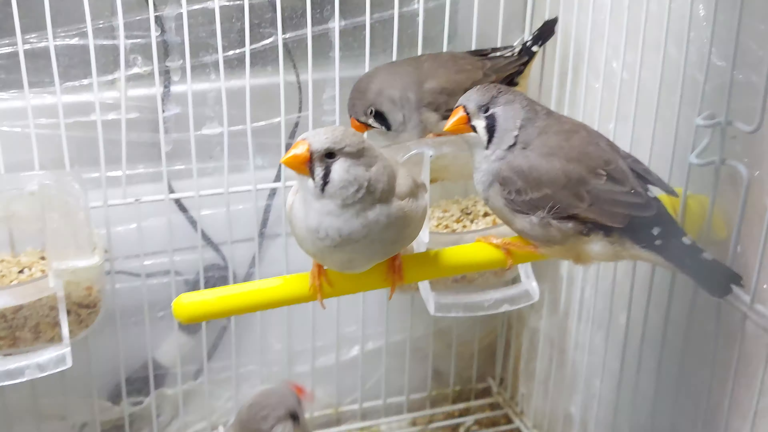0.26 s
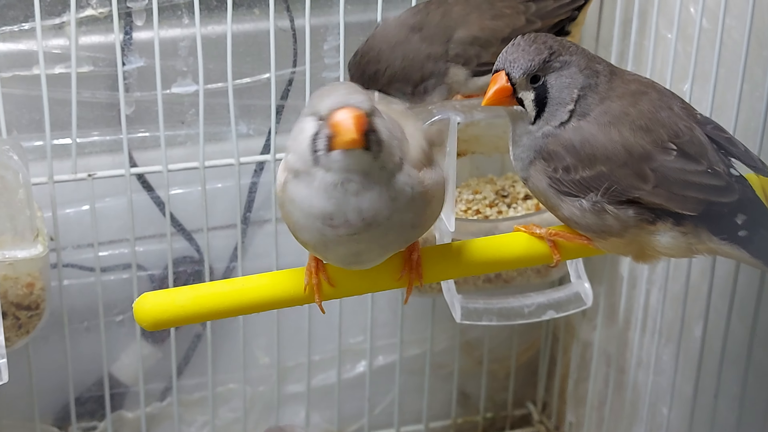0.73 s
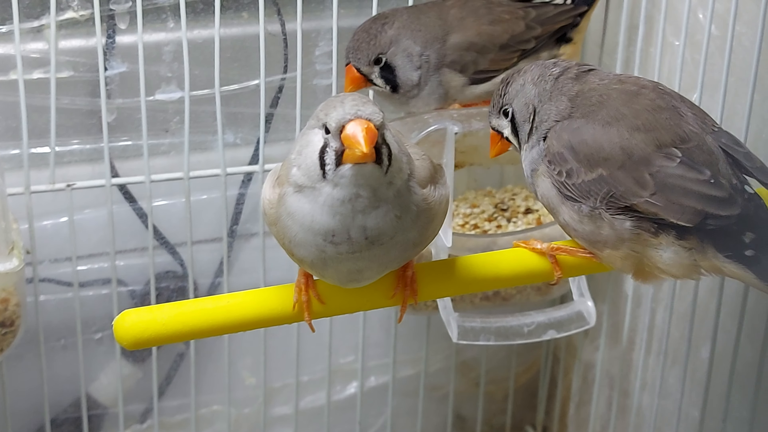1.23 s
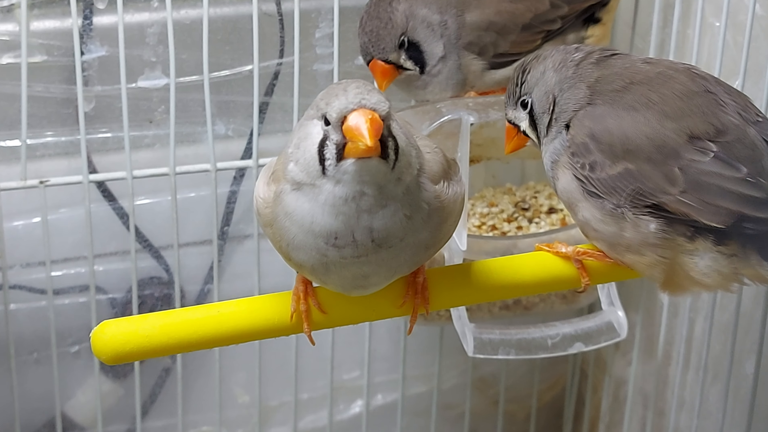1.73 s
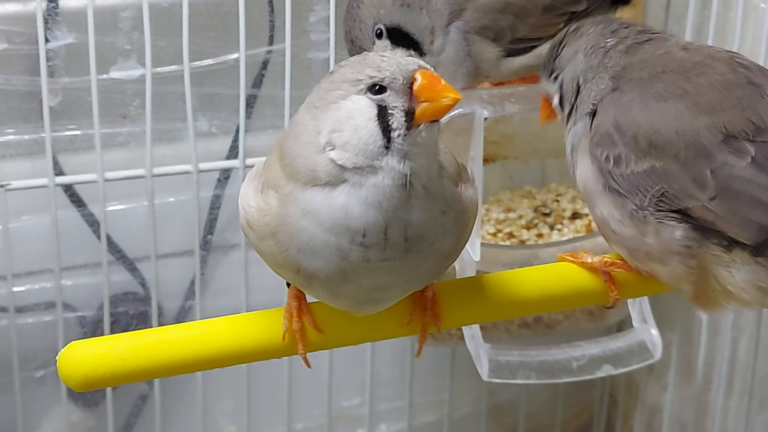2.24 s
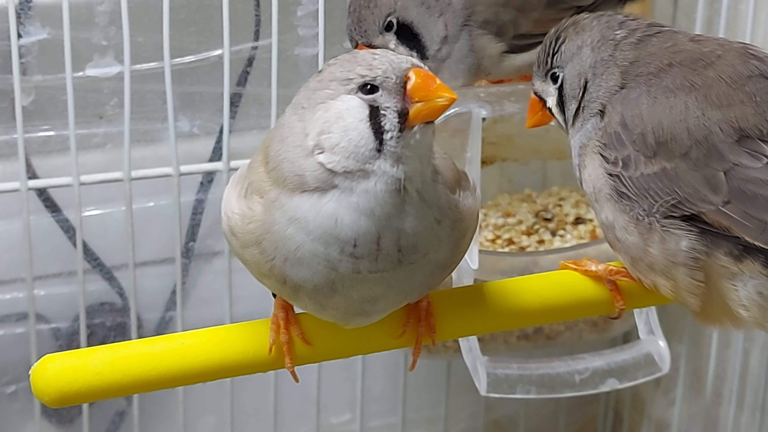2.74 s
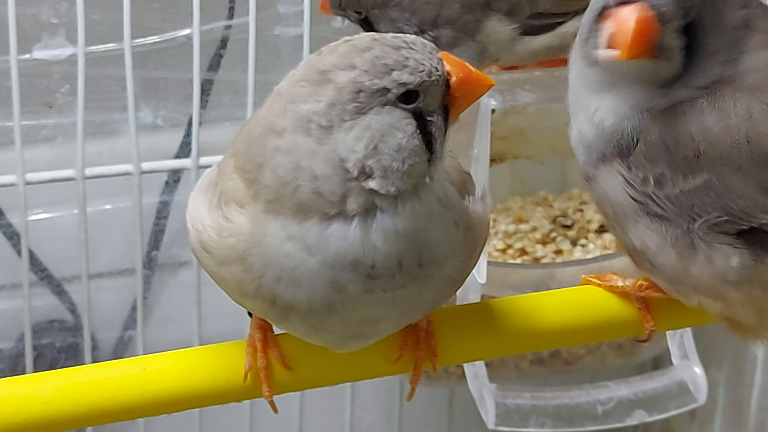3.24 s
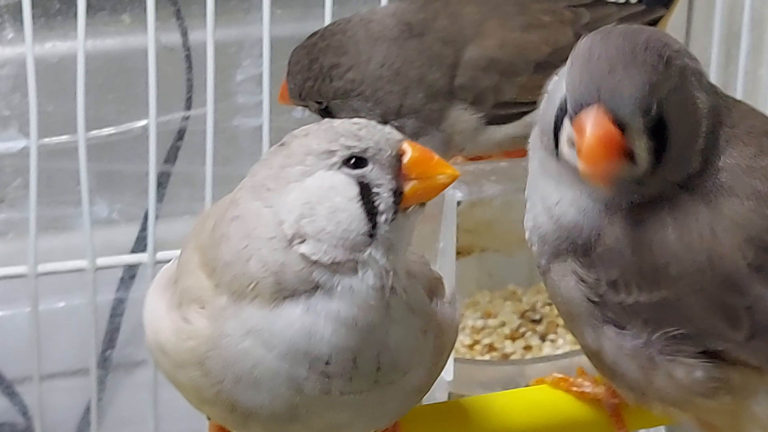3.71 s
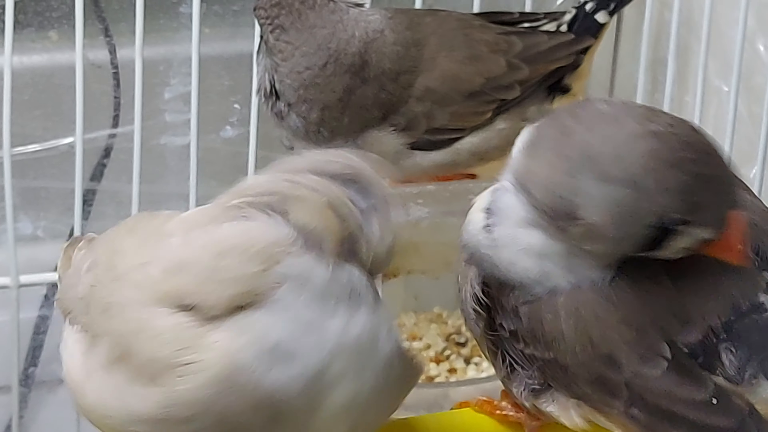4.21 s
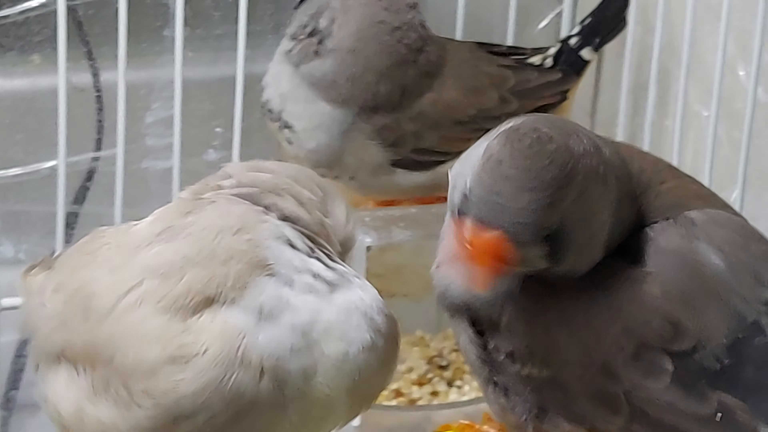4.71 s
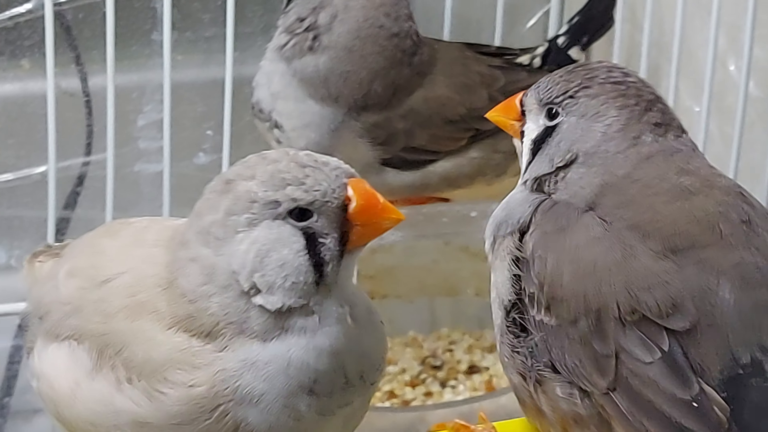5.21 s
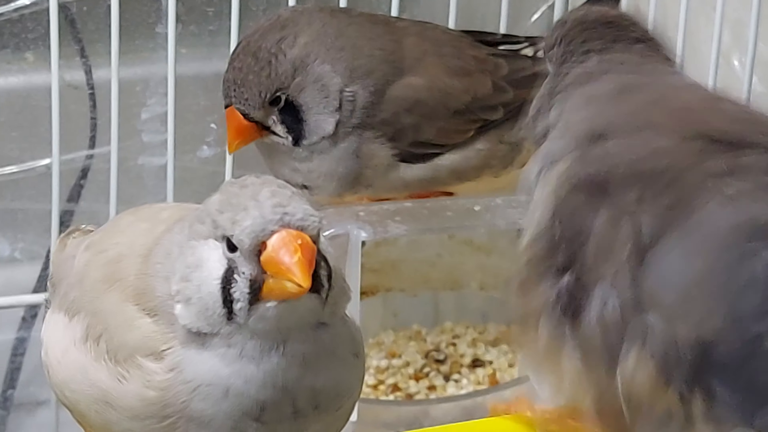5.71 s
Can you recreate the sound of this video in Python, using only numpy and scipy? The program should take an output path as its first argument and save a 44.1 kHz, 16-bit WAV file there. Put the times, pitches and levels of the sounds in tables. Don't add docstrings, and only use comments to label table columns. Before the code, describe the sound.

A husk smacks the microphone as a low drone fades; finches call twice harshly, then softly, among ticks, rustles, knocks and fluttering wings.

```python
import sys
import numpy as np
from scipy import signal
from scipy.fft import rfft, irfft
from scipy.io import wavfile
from scipy.ndimage import uniform_filter1d, map_coordinates

SR = 44100
rng = np.random.default_rng(int(sys.argv[2]) if len(sys.argv) > 2 else 0)


def invert_db(level):
    return 10 ** (np.asarray(level, dtype=float) / 20)


def pcm_store(signal):
    levels = np.round(np.clip(np.atleast_2d(signal), -1, 1) * 32767)
    wavfile.write(sys.argv[1], SR, levels.astype(np.int16).T)


N = 262395
SWELL_DB = 10


def on_hz(points, hz):
    p = np.array(points, float)
    return np.interp(np.log(np.maximum(hz, 1)), np.log(p[:, 0]), p[:, 1])


def unit(x):
    return x / np.sqrt(np.mean(x ** 2, axis=-1, keepdims=True) + 1e-30)


def tint(x, gain):
    n = x.shape[-1]
    return irfft(rfft(x) * gain(np.arange(n // 2 + 1) * SR / n), n)


def hump(f, hz, width):
    return 1 / np.sqrt(1 + ((f * f - hz * hz) / (width * f + 1e-9)) ** 2)


def walk(n, rate):
    k = max(int(SR / rate), 1)
    return unit(uniform_filter1d(uniform_filter1d(rng.standard_normal(n), k), k))


def columns(table):
    s, *cols = np.transpose(table)
    t = np.arange(int(s[0] * SR), int(s[-1] * SR)) / SR
    return int(s[0] * SR), [np.interp(t, s, c) for c in cols]


def fade(n, edge_s):
    i = np.arange(n)
    return np.clip(np.minimum(i, n - i) / (edge_s * SR), 0, 1)


def add(out, x, start, pan_db):
    lag_s_per_db = .000012
    gains = invert_db(np.array([pan_db, -pan_db]) / 2)
    gains = gains * 2 / gains.sum()
    lag = int(round(np.clip(pan_db, -12, 12) * lag_s_per_db * SR))
    for ch, i in enumerate((start + max(-lag, 0), start + max(lag, 0))):
        n = min(x.shape[-1], N - i)
        out[ch, i:i + n] += gains[ch] * (x[ch] if x.ndim > 1 else x)[:n]


def air():
    # (time [s], rumble level [dB])
    traffic = [(0.0, -52.5), (.55, -60.5), (.79, -53.5), (1.2, -62), (2.2, -55), (3.4, -56.5), (4.5, -58.5),
               (5.1, -62.5), (5.95, -54)]
    # (time
    # [s], level [dB])
    stir = [(0.0, 3.5), (.55, -4), (.79, 9.5), (1.11, 1.5), (1.29, -8.5), (1.84, -3.5), (1.97, 1),
            (2.2, -3), (2.77, 5), (3.08, -2.5), (3.33, 4), (3.5, -1), (4.14, 1), (4.27, 2), (4.52, -2),
            (4.8, 6.5), (5.05, 3), (5.45, -3)]
    # (frequency [Hz], level [dB])
    colour = [(15, -36.5), (25, -5), (63, 1.5), (111, 2.5), (150, 1), (208, -15.5), (339, -16),
              (553, -26.5), (2090, -32.5), (3150, -45), (7300, -40.5), (9330, -47.5), (12600, -38.5),
              (15200, -43), (16500, -71.5)]
    # (frequency [Hz], likeness [0-1])
    likeness = [(30, 1), (130, 1), (290, 0.8), (640, 0.16), (1400, 0), (16000, 0)]
    t = np.arange(N) / SR
    stir_db = np.interp(t, *np.transpose(stir))
    # (level [dB], low edge [Hz], high edge [Hz], flicker [dB], trim [dB])
    bands = [(np.interp(t, *np.transpose(traffic)), 34, 220, 1.5, 3),
             (-67.5 + 0.85 * stir_db, 220, 2700, 2.2, 1.5),
             (-71 + 0.79 * stir_db, 2700, 20000, 2.2, 1.5)]
    out = 0
    for db, lo_hz, hi_hz, flicker_db, trim_db in bands:
        band = lambda f: invert_db(on_hz(colour, np.minimum(f, 14000))) * (f > lo_hz) * (f <= hi_hz)
        like = lambda f: np.clip(on_hz(likeness, f), 0, 1)
        mid = tint(rng.standard_normal(N), lambda f: band(f) * np.sqrt(1 + like(f)))
        side = tint(rng.standard_normal(N), lambda f: band(f) * np.sqrt(1 - like(f)))
        pair = unit(np.array([mid + side, mid - side]))
        out = out + pair * invert_db(trim_db + db + flicker_db * walk(N, 25))
    return out


def swell(s, before_s, after_s, hz, glide_before, glide_after, db, drop_db=SWELL_DB):
    start = max(int((s - 2 * before_s) * SR), 0)
    x = np.arange(start, int((s + 2 * after_s) * SR)) / SR - s
    away = np.abs(x) / np.where(x < 0, before_s, after_s)
    return start, hz + x * np.where(x < 0, glide_before, glide_after), db - drop_db * away ** 1.3


def tones(lines, waver, unsteady_db, rate, spread_db):
    out = np.zeros((2, N))
    port_phase = .5 * np.array([[.5], [-.5]])
    for start, hz, db in lines:
        n = len(hz)
        phase = 2 * np.pi * np.cumsum(hz * (1 + waver * walk(n, rate))) / SR
        strength = invert_db(db + unsteady_db * walk(n, rate)) * fade(n, 0.05 / rate + 1 / hz[0])
        line = np.sqrt(2) * np.sin(phase + port_phase) * strength
        add(out, line, start, spread_db * rng.standard_normal())
    return out


def street():
    # (loudest time [s], half length [s], pitch [Hz], glide
    # [Hz/s], level [dB rms])
    drones = [(0.0, 0.285, 78.2, 0, -39.5), (0.5, .25, 77.5, 22, -57), (2, .14, 59, 31, -53.5),
              (2.5, 0.305, 74.05, -0.5, -53), (2.5, .12, 82.84, 12, -44), (3, .45, 83.8, 0.5, -50.5),
              (3, 0.81, 26, -5.5, -55), (2.5, .15, 123.9, 18, -50), (3.5, .15, 128.6, 7, -50),
              (4, 0.2194, 97.6, -6.5, -50), (4, 0.24, 104, 1.5, -55), (5, .6, 34, -1, -60.5),
              (5.6, .4, 52, -5, -62.5), (5.94, 0.26, 46, -42, -49), (0.95, .025, 90, -200, -49)]
    # (loudest time [s], half length [s], pitch [Hz], glide [Hz/s], level [dB rms])
    squeals = [
        (.03, 0.048, 813, -100, -68),
        (1.51, .045, 1860, -300, -71),
        (1.73, .04, 1280, -1200, -76.5),
        (1.72, 0.029, 10050, -3700, -78),
        (4.99, 0.035, 7760, -6000, -75),
        (5.31, .015, 4950, -9000, -77.5),
    ]
    # (turning time [s], pitch [Hz], glide before [Hz/s], glide after [Hz/s], level [dB rms])
    whistles = [
        (2.475, 6330, 8700, -5500, -78),
        (4.17, 11450, 15000, -5600, -70),
        (5.03, 800, 1300, -150, -73),
        (5.09, 5680, -3600, 3000, -81),
        (4.95, 6250, 1000, -4000, -83),
    ]
    straight = lambda rows: [swell(s, half_s, half_s, hz, glide, glide, db)
                             for s, half_s, hz, glide, db in rows]
    bent = [swell(s, .045, .14, *rest, drop_db=3.5) for s, *rest in whistles]
    away = np.abs(np.arange(N) / SR - 5.18) / 0.63
    tyres = unit(tint(rng.standard_normal((2, N)), lambda f: hump(f, 6660, 980) ** 2))
    hiss = tyres * invert_db(-74 - SWELL_DB * away ** 2)
    thin = tones(straight(squeals) + bent, waver=.009, unsteady_db=4, rate=220, spread_db=0)
    engines = tones(straight(drones), waver=0.0069, unsteady_db=2.2, rate=5.3, spread_db=2.0)
    return engines + thin + hiss


def bars():
    # (time [s], pitch [Hz], peak level [dB], t60 [s])
    wires = [
        (.0124, 8400, -25, .004),
        (3.231, 5620, -50, .13),
        (3.231, 9650, -57, .11),
        (3.231, 11930, -56, .09),
        (3.128, 11800, -65, .12),
        (3.371, 12600, -53, .04),
        (3.668, 8400, -57, .05),
        (3.94, 4500, -63, .2),
    ]
    out, t = np.zeros((2, N)), np.arange(8192) / SR
    for s, hz, db, t60 in wires:
        phase = 2 * np.pi * np.cumsum(hz * (1 + 0.0061 * walk(len(t), 150))) / SR
        ring = np.sin(phase + rng.uniform(0, 2 * np.pi, (2, 1)))
        add(out, invert_db(db - 60 * t / t60) * ring, int(s * SR), 0)
    return out


def taps():
    # (time [s], peak level [dB], port ring [Hz], snap level [dB], left minus right [dB])
    husks = [
        (0.0127, -10, 4600, 8.5, -52),
        (3.0356, -2.5, 1610, 6.5, 97.5),
        (4.8, -6.5, 1220, -21, 42),
        (5.8984, -17, 1920, -14, 7),
        (1.5248, -23.5, 1690, 14, -5),
        (1.7941, -26, 1330, -13, 9.5),
        (4.7483, -21, 7400, 1, -15),
    ]
    out, t = np.zeros((2, N)), np.arange(1024) / SR
    for s, db, hz, snap_db, pan_db in husks:
        swing = np.sin(2 * np.pi * hz * t) * t * hz * np.exp(-t * hz / 0.28) * 11.7
        edge = np.sin(2 * np.pi * 12000 * t) + 0.53 * np.sin(2 * np.pi * 6800 * t)
        snap = invert_db(snap_db) * edge * t / .00007 * np.exp(-t / 0.00009)
        noise = unit(tint(rng.standard_normal(len(t)), lambda f: hump(f, 1200, 3500)))
        rattle = invert_db(-20.5) * noise * np.exp(-t / .002)
        add(out, invert_db(db - 12.0) * (swing + snap + rattle), int(s * SR), pan_db)
    return out


def knocks(events, decay_s, rise_s, sharp, grain_db, apart):
    # (frequency [Hz], level [dB])
    snap_colour = [(2500, -9), (4500, -2.5), (6500, -0.5), (9000, -7.5), (13000, 6.5), (15800, -8)]
    out, t = np.zeros((2, N)), np.arange(4096) / SR
    for s, db, hz, treble_db, bass_db, pan_db in events:
        noise = rng.standard_normal((3, 1, len(t))) + apart * rng.standard_normal((3, 2, len(t)))
        shape = (1 - np.exp(-t / rise_s)) * np.exp(-t / decay_s) * invert_db(grain_db * walk(len(t), 450))
        ring = unit(tint(noise[0], lambda f: hump(f, hz, hz / sharp)))
        snap = invert_db(treble_db) * unit(tint(noise[1], lambda f: invert_db(on_hz(snap_colour, f))))
        thud = invert_db(bass_db) * unit(tint(noise[2], lambda f: hump(f, 300, 340) ** 2))
        add(out, invert_db(db - 14.0) * (ring + snap + thud) * shape, int(s * SR), pan_db)
    return out


def scuffs():
    # (time [s], peak level [dB], ring [Hz], treble [dB], left minus right [dB])
    rustles = [(0.9424, -39.5, 4250, -4, -16.5), (1.02, -43, 4026, -4.5, -8.5),
               (1.1506, -49, 8700, -7.5, -8), (1.3753, -46.5, 8420, -3.5, -6), (1.5834, -54, 4400, 11, 0.5),
               (3.2311, -38.5, 4960, 4, 7.5), (4.37, -53, 7240, 6.5, 0.5), (5.7593, -48.5, 6570, 5.5, 1),
               (5.7834, -35, 6760, 6, 1.2), (5.8255, -34.5, 6400, 2, 1), (5.8613, -36, 5570, 6.5, -1),
               (5.842, -43, 6000, 8.5, 1), (5.907, -45.5, 5500, 8, 0.5), (5.932, -47, 4000, 6, 1),
               (0.0, -40.5, 4500, -13, 3), (0.0, -44, 2100, -23, -2.5), (2.73, -49.5, 4260, -8, 0),
               (2.86, -47, 4180, -7, 0.5)]
    # (time [s], peak level [dB], treble [dB], thud [dB], left minus right [dB])
    hops = [(0.2034, -62, 13.5, 25, -1), (0.9437, -40.5, -25, 10, -5), (1.3023, -45.5, -10, -4.5, 8),
            (1.3457, -56, 6.5, -6.5, 5.5), (1.8332, -38.5, -31, 5, 5.5), (2.0155, -36, -4, -20, -2.7),
            (3.3722, -36.5, -9.5, -31, 8), (3.6713, -51, 1.5, 11.5, 0), (4.2096, -49, 10, -19, 1),
            (4.2567, -41.5, -1, -17, 0), (4.294, -54.5, 14.5, -19.5, -1.5), (5.2674, -52, -26, -19.5, 12.5),
            (5.5886, -52.5, 4.5, -22, -0.5)]
    # (time [s], peak level [dB], treble [dB], thud [dB], left minus right [dB])
    tray = [(1.555, -48.5, -13, -13, 0.5), (1.6, -49, -15, -15, 0), (1.6653, -51.5, -18, -29, 5),
            (1.7962, -54, -25, -16, -12), (1.944, -51.5, -26, -7.5, -3), (2.8482, -44, -19, -39, 1),
            (3.3353, -45.5, -4, 1, 2), (3.685, -45, -15, 9.5, 5.5), (3.8064, -52, 2, 3, 6),
            (3.9353, -43.5, 4, -20, 7), (5.2164, -43.5, -16.5, 1, 3.5)]
    # (time [s], peak level [dB], treble [dB], thud [dB], left minus right [dB])
    digs = [
        (1.495, -55.5, 10.5, 0, 0.5),
        (2.7224, -41, -35, -5, 3),
        (4.4055, -50, 8, -33, 2.3),
        (4.8795, -40.5, -3, -2, 6.5),
    ]
    events = []
    for ring_hz, rows in ((828, hops), (1330, tray), (1800, digs)):
        events += [(s, db, ring_hz, *rest) for s, db, *rest in rows]
    events += [(*row, -15, pan_db) for *row, pan_db in rustles]
    return knocks(events, decay_s=0.025, rise_s=0.00068, sharp=1.58, grain_db=2.0, apart=1.0)


def clicks():
    # (time [s], peak level [dB], ring [Hz], treble [dB], left minus right [dB])
    ticks = [(5.8996, -18, 2300, 0, 1.5), (1.0658, -28, 4460, -1, 6), (1.794, -35.5, 1340, -6.5, 6.5),
             (2.0775, -31, 1414, -18.5, -19), (2.2739, -39.5, 3200, -41, 9),
             (2.5326, -36, 3580, -0.5, 12.5), (2.6186, -36.5, 1480, -27, 9), (2.6485, -31.5, 1350, -2, 9),
             (2.671, -36.5, 1230, 5.5, 15.5), (2.9466, -50.5, 2170, 8, 9), (2.9731, -36, 1000, -34, 12),
             (3.4485, -20.5, 1800, -5.5, 35), (4.559, -37, 1964, -11, 8.5), (4.6665, -22.5, 5600, 8, -4),
             (4.747, -31.5, 7300, 4, -10), (5.1463, -35.5, 7050, 2, -2), (5.697, -41.5, 6300, -3, -1),
             (5.874, -26.5, 5700, 7.5, 3), (0.1368, -48, 2080, -5, 4), (0.376, -49.5, 2040, 10, -7.5),
             (1.5851, -38.5, 4400, 1.5, 0), (2.8, -38, 1410, -12, 7), (3.3142, -43, 1150, -10, 9),
             (3.338, -32, 1207, -12, 10), (3.354, -44, 1300, 4.5, 3), (3.5289, -45.5, 1490, 9.5, 0),
             (4.1314, -66, 1260, -4, 7), (4.4079, -41, 2120, 7.5, -0.5), (4.992, -39.5, 1190, -8.5, 1),
             (5.8256, -27.5, 6600, 4, 3), (5.855, -33, 3500, -3, 3), (1.8314, -29, 1130, -15, 4),
             (1.5258, -35.5, 4450, 2, -0.5), (3.1305, -39, 2500, 7, 5.5), (5.4673, -42, 3000, 11, 1.5),
             (2.745, -42.5, 1500, -8, -3), (5.612, -51, 7000, 8, 0)]
    thud_db = lambda hz, treble_db: -9 - 0.6 * treble_db - 3 * np.log2(hz / 1330)
    events = [(s, db, hz, treble_db, thud_db(hz, treble_db), pan_db)
              for s, db, hz, treble_db, pan_db in ticks]
    return knocks(events, decay_s=0.0018, rise_s=.0001, sharp=3.0, grain_db=-2.0, apart=0.65)


def loud_call(s, length_s, top_hz, db, fading_db):
    rise_s, release_s = .028, 0.029
    sag, slack_hz, slack_sag = 5200, 609, 1100
    t = np.arange(int(length_s * SR)) / SR
    short = np.clip(1 - t / rise_s, 0, 1)
    late = np.maximum(t - rise_s, 0)
    slack_s = (top_hz - slack_hz) / sag
    hz = top_hz * (1 - (1 - .87) * short ** 3)
    hz = hz - sag * np.minimum(late, slack_s) - slack_sag * np.maximum(late - slack_s, 0)
    release = np.clip(1 - (length_s - t) / release_s, 0, 1)
    held_db = fading_db * np.minimum(late / slack_s, 1)
    level_db = db - 23.5 * short ** 3 - held_db - 11.5 * release
    rough = np.minimum(.14 + 3.0 * (1 - hz / top_hz), .75)
    return int(s * SR), (hz, level_db, rough)


def soft_call(s, length_s, top_hz, db, lateness):
    arch = [
        (0, 0.0),
        (.14, .03),
        (.33, .5),
        (.48, .95),
        (.63, 1.0),
        (.79, .93),
        (1, 0.0),
    ]
    t = np.arange(int(length_s * SR)) / SR
    slack = 1 - np.interp((t / length_s) ** lateness, *np.transpose(arch))
    attack_db = 7 * np.clip(1 - t / 0.01, 0, 1)
    return int(s * SR), (top_hz * (1 - 0.16 * slack), db - 9 * slack - attack_db)


def voice(hz, db, rough, beak, throat, tilt):
    port_lead_s, blur_hz = .0002, 9500
    n, share, ports = len(hz), np.clip(rough, 0, 1), []
    phase = 2 * np.pi * np.cumsum(hz * (1 + .05 * share * walk(n, 300))) / SR
    k = np.arange(1, 36)[:, None]
    carried_hz = k * hz * (hz.max() / hz) ** np.clip(beak, 0, 1)
    weights = invert_db(on_hz(throat, carried_hz)) * (k * hz < SR * .4)
    weights = weights / np.sqrt((weights ** 2).sum(0) / 2)
    clean_hz = blur_hz * (1.7 - np.max(share))
    clean = lambda f: 1 / np.sqrt(1 + (f / clean_hz) ** 4)
    spread = rng.uniform(0, 2.4, k.shape)
    for side in (.5, -.5):
        scatter = rng.uniform(0, 2 * np.pi, k.shape) * np.minimum(k * hz.max() / 15000, 1)
        angles = spread + side * 2 * np.pi * port_lead_s * k * hz + scatter
        breaks_db = 8 * share * (np.minimum([walk(n, 130) for _ in k], 1.2) - .5)
        shade_db = side * on_hz(tilt, k * hz)
        strength = weights * clean(k * hz) * invert_db(shade_db + breaks_db)
        stack = (strength * np.cos(k * phase + angles)).sum(0)
        puffs = rng.standard_normal(n) * (1 + np.cos(phase))
        rasp = unit(tint(puffs, lambda f: invert_db(on_hz(throat, f) + side * on_hz(tilt, f))))
        hiss = invert_db(4.5) * tint(rasp, lambda f: np.sqrt(1 - clean(f) ** 2))
        ports.append(np.sqrt(1 - share ** 2) * (stack + hiss) + share * invert_db(-3) * rasp)
    flutter_db = 4 * share * (np.minimum(walk(n, 300), 1.2) - .5)
    return np.array(ports) * invert_db(db + flutter_db) * fade(n, .005)


def finches():
    # (start time [s], length [s], top pitch [Hz], level [dB], fading while held [dB])
    loud = [
        (0.617, 0.12, 896, -27.5, -0.5),
        (0.795, 0.12, 911.7, -22, 5),
    ]
    # (start time [s], length [s], top pitch [Hz], level [dB], lateness of the arch [power])
    gentle = [
        (2.287, 0.079, 453.3, -34.5, 1.1),
        (3.126, 0.081, 405.8, -36.5, .85),
        (5.465, 0.074, 465.5, -32.5, 0.92),
    ]
    # (time [s], pitch [Hz], level [dB])
    squawk = [
        (3.386, 467.4, -59),
        (3.399, 397.5, -41),
        (3.403, 623, -34),
        (3.412, 488.3, -33),
        (3.426, 395, -44.5),
    ]
    # (frequency [Hz], level [dB])
    throats = [
        [(500, -36.5), (850, -28), (1250, -22.5), (1780, -17), (2600, -10), (3000, -7.5), (3600, 0), (4550, -7),
         (4900, -18), (5450, -23), (7200, -40.5), (8500, -30), (12500, -41.5), (14800, -29), (16000, -38.5)],
        [(240, -47.5), (400, -17.5), (865, -2.5), (1380, 2), (1960, 0), (2550, 2.5), (3690, 5), (4950, -14.5),
         (7750, -26.5), (9610, -20.5), (13900, -37.5), (16000, -29.5)],
        [(250, -38.5), (400, -20), (800, -6.5), (1220, -17.5), (1620, -8), (2050, 2.5), (3250, -11),
         (4000, -15.5), (4350, -27), (4850, -26), (5500, -36), (9000, -38)],
        [(300, -28), (1000, -6.5), (1600, -12), (2300, 0), (2900, -6), (4400, -14.5), (5400, -21.5),
         (8400, -23.5), (9800, -38), (14000, -35.5)],
        [(300, -42.5), (470, -21.5), (940, -10), (1400, -4.5), (1880, -10), (2350, 1.5), (2900, -5),
         (3750, 1.5), (4400, -18), (6500, -22), (9300, -36), (13700, -38.5), (16000, -39.5)],
    ]
    # (frequency [Hz], left minus right [dB])
    tilts = [
        [(500, 12.5), (900, 26.5), (1300, 2), (1800, 1), (2700, -1.5), (3600, -5.5), (4500, -4.5), (15000, -7)],
        [(450, -5), (1100, 6.5), (1800, -5), (2300, 8), (2900, 8), (3600, 0), (4100, -9.5), (4600, 4.5)],
        [(400, -5), (800, 2), (1220, -8), (1630, 4.5), (2050, 3), (2800, 5.5), (3250, 6), (4100, 8.5)],
        [(400, -4), (900, 1), (2300, 3), (4200, -6.5), (15000, -3.5)],
        [(460, -3), (1400, 7), (1860, -6), (2330, 12.5), (2800, 12.5), (3300, -1.5), (3700, -7.5), (4650, 7.5)],
    ]
    # (left minus right [dB], roughness of a soft call [0-1], beak opening with pitch [0-1], room share [dB])
    perches = [
        (-6, 0, .1, 5),
        (-6, 0, .1, 5),
        (3, .07, .6, -6),
        (4, .1, .3, -4),
        (3, .3, .4, -4),
        (0, .07, .7, -7),
    ]
    out, send = np.zeros((2, N)), np.zeros((2, N))
    calls = [loud_call(*c) for c in loud] + [soft_call(*c) for c in gentle] + [columns(squawk)]
    calls = sorted(calls, key=lambda c: c[0])
    for k, ((start, (hz, db, *own)), (pan_db, rough, beak, room_db)) in enumerate(zip(calls, perches)):
        caller = max(k - 1, 0)
        call = voice(hz, db, own[0] if own else rough, beak, throats[caller], tilts[caller])
        add(out, call, start, pan_db)
        add(send, invert_db(room_db) * call[1], start, 0)
    return out, send


def wings():
    # (time [s], level [dB])
    flurry = [
        (5.76, -80),
        (5.822, -54.5),
        (5.95, -56),
    ]
    # (frequency [Hz], level [dB])
    colour = [(120, -28), (200, -1), (401, 2), (899, -13.5), (1740, -8), (2290, -17), (5330, -10.5),
              (8120, -27), (16000, -11)]
    out, (start, (db,)) = np.zeros((2, N)), columns(flurry)
    n = len(db)
    noise = unit(tint(rng.standard_normal((2, n)), lambda f: invert_db(on_hz(colour, f))))
    out[:, start:start + n] = 2.64 * noise * invert_db(db + 4.6 * walk(n, 90))
    return out


def room(x):
    t60_s, treble_t60_s, room_db, stir_s = 0.26, 0.2, -4.5, .00006
    t = np.arange(SR // 2) / SR
    low = lambda f: 1 / (1 + (f / 4500) ** 4)
    noise = rng.standard_normal((2, 2, len(t))) * np.clip(t / 0.0024, 0, 1)
    dull = tint(noise[0], low) * invert_db(-60 * t / t60_s)
    bright = tint(noise[1], lambda f: 1 - low(f)) * invert_db(-60 * t / treble_t60_s)
    tail = unit((dull + bright) * (1 + 0.75 * np.exp(-t / 0.028))) / np.sqrt(len(t))
    paths = np.arange(N) + stir_s * SR * walk(N, 120)
    stirred = map_coordinates(x.mean(0), [paths], order=1, mode="nearest")
    return invert_db(room_db) * signal.fftconvolve(stirred[None], tail, axes=1)[:, :N]


def scene():
    sharp, brushed = clicks(), scuffs()
    calls, send = finches()
    echoes = room(send + .6 * sharp + invert_db(0.5) * brushed)
    soft = calls + brushed + echoes + bars() + wings() + street() + air()
    return tint(soft, lambda f: f < 15800) + sharp + taps()


def band_limit(x):
    return signal.sosfilt(signal.butter(12, 16980, fs=SR, output="sos"), x)


def record(dry):
    mix = tint(dry, lambda f: np.clip((16800 - f) / 400, 0, 1))
    return band_limit(mix)


dry = scene()
out = record(dry)
pcm_store(out)
```